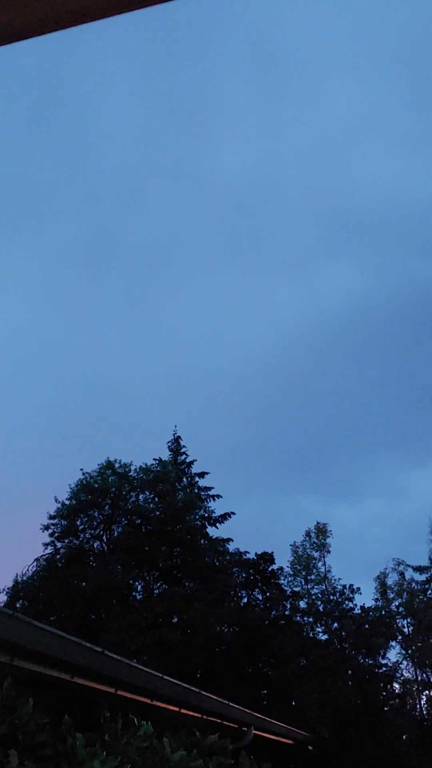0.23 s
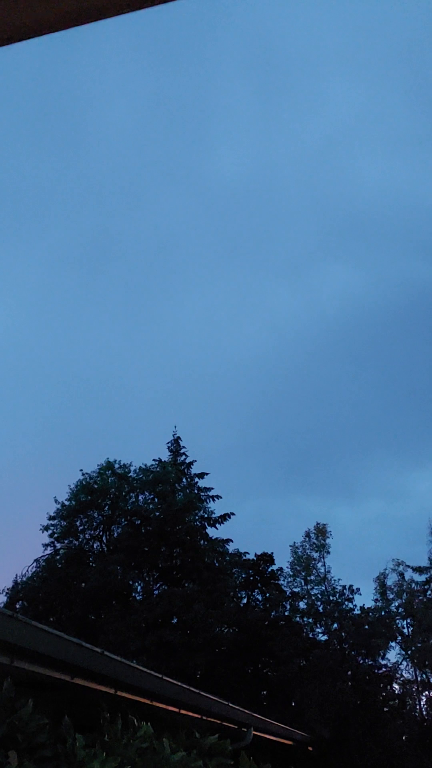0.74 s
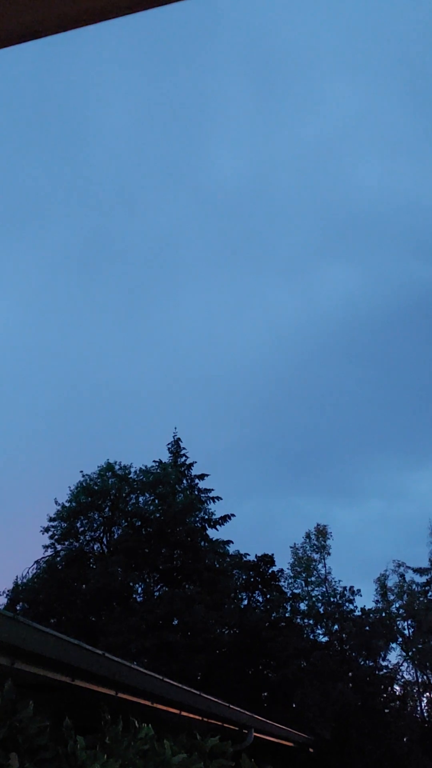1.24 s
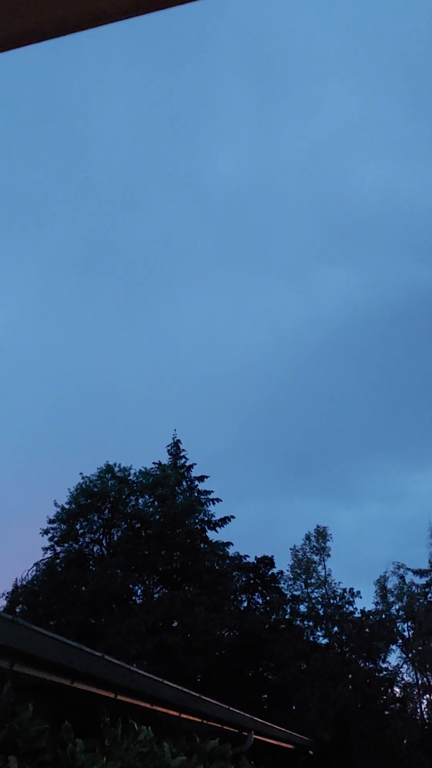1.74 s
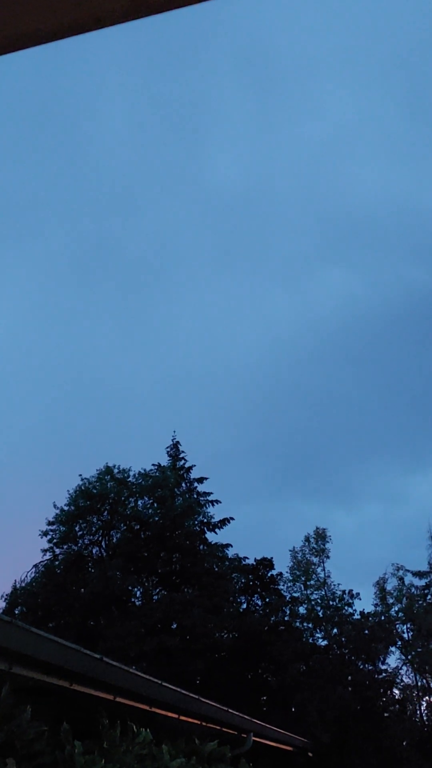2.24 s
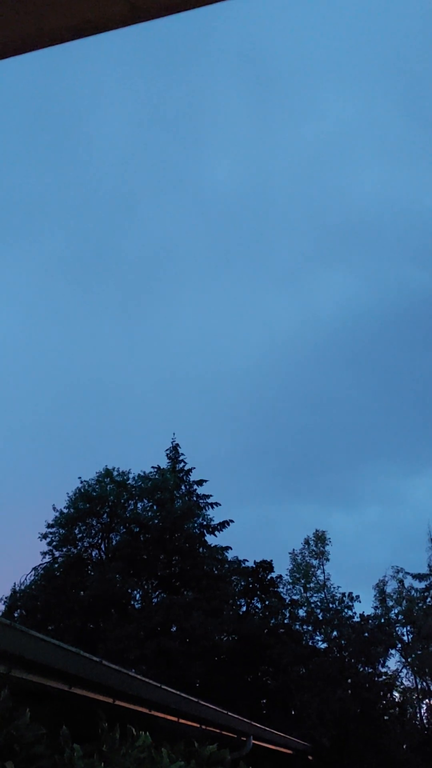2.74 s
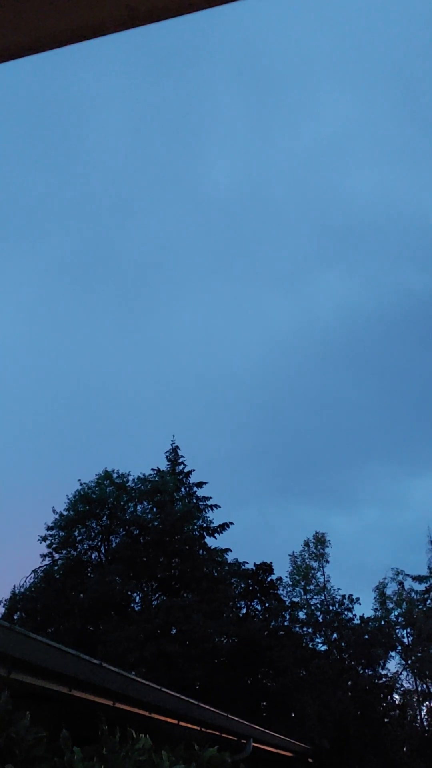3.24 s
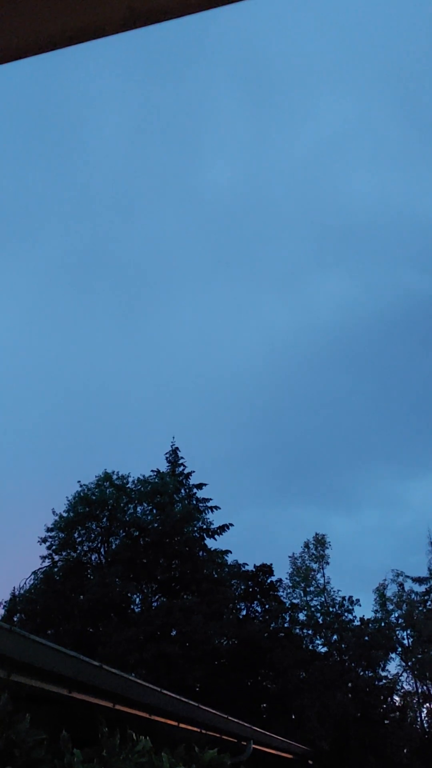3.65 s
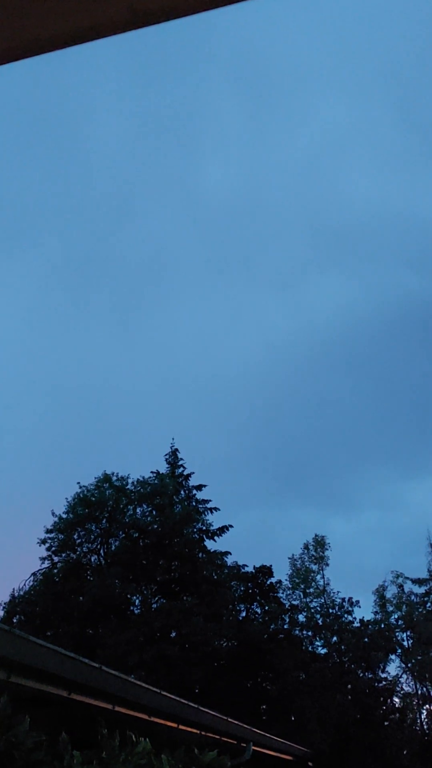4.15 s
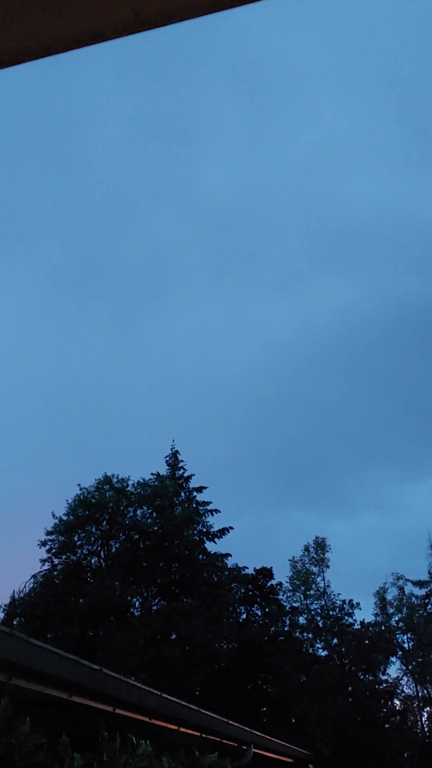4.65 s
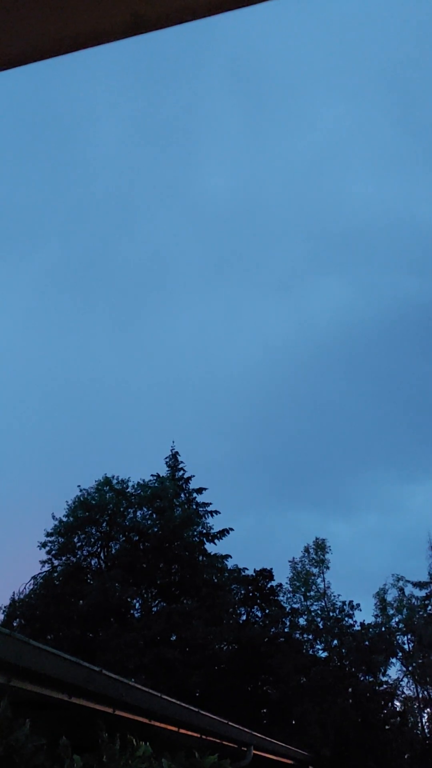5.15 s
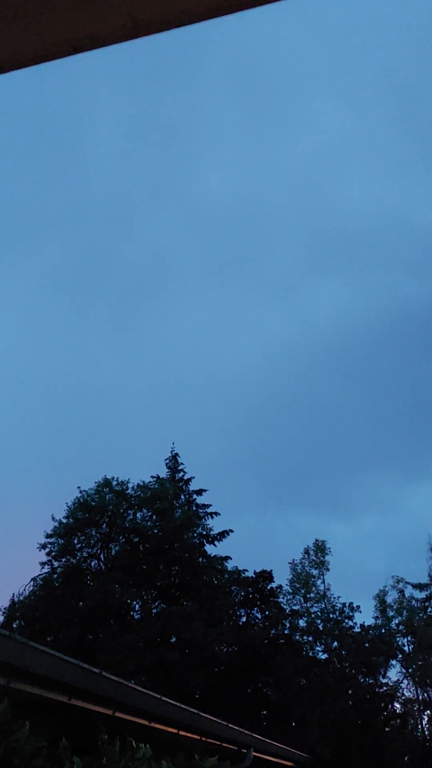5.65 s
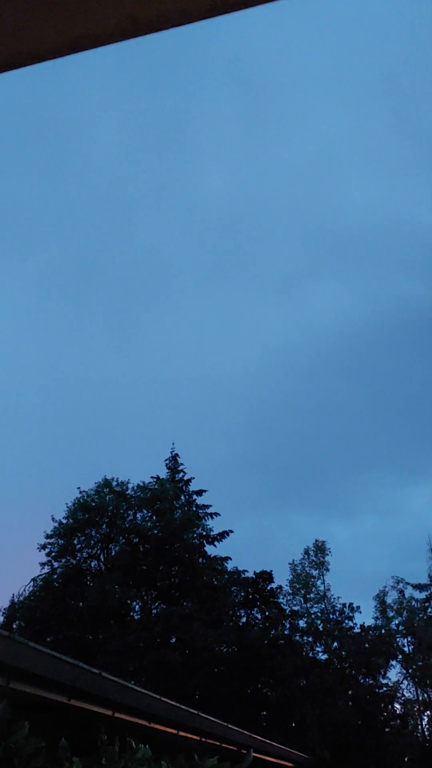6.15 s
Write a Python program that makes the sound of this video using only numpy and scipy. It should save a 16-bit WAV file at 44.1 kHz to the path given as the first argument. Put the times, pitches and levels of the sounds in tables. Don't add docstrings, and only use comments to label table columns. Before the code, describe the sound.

Low, distant thunder rumbles continuously beneath even rainfall outdoors at dusk. Its first swell is a heavy double thud, followed by a long uneven grumble, a second push midway and a third near the end. Over it, soft wide rain on foliage, hollow little knocks on a gutter, thin ticks and crisp splashing drops close to a small stereo microphone sheltered by a roof.

```python
import sys
import numpy as np
from scipy import signal
from scipy.fft import rfft, irfft
from scipy.io import wavfile
from scipy.ndimage import uniform_filter1d

SR = 44100
rng = np.random.default_rng(int(sys.argv[2]) if len(sys.argv) > 2 else 0)


def magnitude_from_level(level_db):
    exponent = np.asarray(level_db, float) / 20
    return 10 ** exponent


def digitize_waveform(pressure):
    field = np.atleast_2d(pressure).T
    bounded = np.clip(field, -1, 1)
    quanta = np.round(bounded * 32767).astype(np.int16)
    wavfile.write(sys.argv[1], SR, quanta)


N = 281786
HZ = np.fft.rfftfreq(N, 1 / SR)
TIME = np.arange(N) / SR

# f/Hz, density/dB per Hz
RAIN_COLOUR = [(200, -19), (380, -4.5), (620, -14), (860, -9.5), (1390, -13.5), (1650, -8), (2300, -8.5),
               (2800, -12.5), (5500, -16), (7600, -27), (8500, -30), (10000, -25.5), (15000, -21),
               (16000, -20)]


def evened(x):
    return x / np.sqrt(np.mean(x ** 2) + 1e-20)


def control(table, column):
    columns = np.transpose(table)
    return np.interp(TIME, columns[0], columns[column])


def read(points, column=1):
    table = np.transpose(points)
    return np.interp(np.log(HZ + 1), np.log(table[0] + 1), table[column])


def peaks(rings):
    return sum(db / (1 + (2 * (HZ - hz) / width_hz) ** 2) for hz, width_hz, db in rings)


def bands(edges_hz, order):
    below = [1 / (1 + (HZ / edge) ** order) for edge in edges_hz]
    return np.sqrt(np.diff([0 * HZ] + below + [1 + 0 * HZ], axis=0))


def coloured(x, gain):
    return irfft(rfft(x) * gain, N)


def add(mix, s, sound):
    part = mix[..., round(s * SR):][..., :sound.shape[-1]]
    part += sound[..., :part.shape[-1]]


def clicks(per_s, spread_db, rows):
    size = magnitude_from_level(spread_db * np.minimum(rng.exponential(1, (rows, N)), 5))
    present = rng.random((rows, N)) < per_s / SR
    return size * present * rng.choice([-1., 1.], (rows, N))


def burst(t60, rise_s):
    t = np.arange(int(.25 * SR)) / SR
    shape = (1 - np.exp(-t / rise_s)) * magnitude_from_level(-60 * t / np.clip(t60, .01, .5))
    return t, shape / shape.max()


def ports(x, other):
    # f/Hz, likeness/0-1, lead of the left/rad
    spacing = [(25, 1, 1.05), (60, 1, .82), (110, 1, .6), (165, .97, .5), (250, .94, 0), (320, .9, .45),
               (470, .74, .85), (660, .5, 0), (830, .74, -.15), (1000, .05, -.2), (1600, .15, 2.6),
               (1730, .5, 2.7), (1900, .08, 2.7), (16000, .05, 2.7)]
    same = np.clip(read(spacing), 0, 1)
    lead = np.exp(-1j * read(spacing, column=2))
    right = same * lead * rfft(x) + np.sqrt(1 - same ** 2) * rfft(other)
    return irfft(np.array([rfft(x), right]), N)


def wash():
    frames = N // 64 + 5
    a, b, c, d, patches = rng.standard_normal((frames, 129, 5)).T
    patches = uniform_filter1d(patches, size=5, axis=0)
    patches = evened(uniform_filter1d(patches, size=40, axis=1))
    flicker = evened(uniform_filter1d(rng.standard_normal(frames), size=30))
    z = np.array([a + 1j * b, c + 1j * d]) * magnitude_from_level(0.65 * patches + 0.84 * flicker)
    return evened(signal.istft(z, nperseg=256, noverlap=192)[1][:, :N])


def patter():
    out = np.zeros((2, N))
    puff_power = burst(t60=0.065, rise_s=0.0024)[1][None] ** 2
    everywhere = clicks(per_s=55, spread_db=2.0, rows=1) ** 2
    for gain in bands([1300, 2600, 4500, 7500, 11500], order=6)[1:]:
        hits = everywhere + clicks(per_s=120, spread_db=3.0, rows=1) ** 2
        power = signal.oaconvolve(hits, puff_power)[:, :N]
        out += coloured(rng.standard_normal((2, N)) * np.sqrt(abs(power)), gain)
    spray = clicks(per_s=400, spread_db=4.5, rows=2)
    spray = coloured(spray, bands([9000], order=4)[1])
    return evened(out) + magnitude_from_level(-2.0) * evened(spray)


def rain():
    # t/s, rain level/dB, gust/dB
    shower = [(0.0, -55.5, -1.5), (0.55, -55, 1), (1.69, -55.5, 0), (2.9, -57, -1), (3.29, -55.5, 0.5),
              (3.79, -56.5, 0), (4.4, -55.5, -1), (4.72, -57, -2), (5.12, -55.5, -1), (5.43, -56.5, -0.5),
              (6.39, -56, 0.5)]
    # f/Hz, width/Hz, level/dB
    gutter_ring = [(1490, 28, -1.5), (1680, 220, 3), (530, 45, 0.5)]
    rain_db = control(shower, column=1)
    low_db = -62.5 + rain_db - rain_db.mean() + control(shower, column=2)
    mix = wash() + magnitude_from_level(-4.0) * patter()
    colour = magnitude_from_level(read(RAIN_COLOUR) + peaks(gutter_ring))
    low, high = (evened(coloured(mix, gain * colour)) for gain in bands([1200], order=8))
    return ports(*(low * magnitude_from_level(low_db + 3.0) + high * magnitude_from_level(rain_db + 2.5)))


def taps():
    t, shape = burst(t60=0.029, rise_s=.003)
    out = np.zeros((2, N))
    for hz in (1600, 1730, 1900):
        hits = clicks(per_s=15, spread_db=3.0, rows=1)
        ring = shape * np.sin(2 * np.pi * hz * t)
        out += signal.oaconvolve(hits, ring[None])[:, :N]
    return magnitude_from_level(-77.0) * evened(out) * np.array([[1.], [-1.]])


def knock(table, rise_s, left_db):
    out = np.zeros((2, N))
    sides = magnitude_from_level([[left_db / 2], [-left_db / 2]])
    noise = rng.standard_normal((len(table), 2, SR // 4))
    for (s, db, hz, width_hz, t60), puff in zip(table, noise):
        t, shape = burst(t60, rise_s)
        resonance = signal.iirpeak(hz, hz / width_hz, SR)
        ring = signal.lfilter(*resonance, puff)
        ring = signal.lfilter(*resonance, ring)
        add(out, s, magnitude_from_level(db - 4.0) * sides * shape * evened(ring)[:, :len(t)])
    return out


def drips():
    # t/s, peak/dB, f/Hz, width/Hz, t60/s
    gutter_drips = [(0.42, -47, 1950, 500, 0.036), (0.4695, -51, 2060, 1500, 0.092),
                    (.4715, -48.5, 4800, 4500, 0.066), (0.469, -44.5, 1860, 1600, 0.076),
                    (.486, -51, 2200, 1590, .07), (0.503, -53, 1900, 900, 0.03),
                    (.82, -52.5, 5300, 4000, 0.16), (1.163, -49, 4960, 2180, .06),
                    (3.77, -51, 1570, 1420, 0.31), (3.802, -50, 4250, 900, 0.066),
                    (3.921, -47, 1580, 900, 0.056), (4.115, -49.5, 4444, 2500, 0.063),
                    (4.311, -55, 1717, 600, .04), (4.39, -50, 1630, 700, 0.039),
                    (4.457, -54, 5170, 3000, 0.12), (2.428, -65, 4470, 3000, 0.054),
                    (2.912, -64, 4460, 2980, .06), (4.937, -49.5, 2300, 1090, 0.06),
                    (5.045, -44, 14500, 3500, .012), (5.113, -53.5, 3780, 4000, 0.38),
                    (5.126, -52, 610, 70, 0.15), (5.336, -46, 1960, 500, 0.046),
                    (5.714, -59, 3240, 3000, 0.078)]
    # t/s, peak/dB, f/Hz
    gutter_flecks = [(0.5947, -47, 1990), (0.6361, -43, 1600), (0.8467, -42, 1600), (1.0637, -55, 1570),
                     (1.1706, -45, 1980), (1.2408, -43, 1780), (1.3151, -48, 2060), (1.5283, -42, 1780),
                     (1.582, -38, 1850), (1.7205, -45, 1710), (1.7594, -50, 1740), (2.054, -41, 1610),
                     (2.1672, -43, 1660), (2.209, -41, 1790), (2.3323, -39.5, 1700), (2.5193, -40, 1590),
                     (2.875, -45, 1930), (3.365, -46, 1730), (3.7735, -48, 1650), (3.92, -47, 1570),
                     (3.971, -44, 1530), (4.168, -45, 1660), (4.226, -48, 1600), (4.3105, -42, 1710),
                     (4.394, -46, 1680), (4.5043, -45, 1720), (4.672, -43, 1900), (4.7667, -49, 1610),
                     (4.8421, -53, 1770), (4.938, -45, 2270), (5.1309, -44, 1360), (5.3335, -49, 1850),
                     (5.3657, -50, 1620), (5.5041, -50, 1650), (5.7196, -43, 1970), (6.1287, -43, 1600)]
    # t/s, peak/dB, f/Hz, width/Hz, t60/s
    hard_ticks = [(.4334, -49, 11000, 9000, .012), (.4773, -33.5, 1750, 890, 0.039),
                  (.5661, -48, 11000, 9000, .015), (2.812, -51, 12500, 7000, .012),
                  (3.0425, -44, 13500, 4000, .09), (3.1931, -50, 11000, 9000, .012),
                  (3.236, -50, 12000, 6000, 0.011), (3.3478, -58, 13000, 6000, .012),
                  (3.7065, -60, 12500, 6000, .012), (3.8023, -53, 12000, 8000, .012),
                  (4.9826, -47, 12500, 7000, .012), (5.0469, -45, 14000, 5000, .012),
                  (5.056, -50, 14500, 3000, .04), (5.3368, -54, 12000, 8000, .012)]
    # t/s, peak/dB, f/Hz
    leaf_pecks = [(0.4269, -50, 3980), (0.472, -49, 3610), (0.8949, -46, 3790), (0.9577, -50, 3750),
                  (1.223, -47, 4230), (1.3425, -45, 3960), (1.5077, -41, 4390), (1.5474, -46, 3590),
                  (2.4279, -48, 4410), (2.812, -47, 4810), (2.909, -46, 3510), (3.1931, -49, 3240),
                  (3.3253, -45, 3090), (3.3862, -46, 5460), (3.802, -45, 4170), (3.921, -48, 3660),
                  (4.3106, -47, 4090), (4.3896, -48, 3500), (4.4588, -48, 3960), (4.5471, -47, 4960),
                  (5.1327, -47, 4480), (5.3283, -47, 3230), (5.459, -48, 3570), (5.5288, -52, 3500),
                  (6.2422, -54, 3370), (6.319, -50, 3320)]
    fleck_width_hz, fleck_t60 = 400, 0.033
    peck_width_hz, peck_t60 = 1600, 0.033
    flecks = [(s, db - 4.5, hz, fleck_width_hz, fleck_t60) for s, db, hz in gutter_flecks]
    pecks = [(s, db - 6.5, hz, peck_width_hz, peck_t60) for s, db, hz in leaf_pecks]
    on_gutter = knock(gutter_drips, rise_s=0.0029, left_db=-0.5) + knock(flecks, rise_s=0.0017, left_db=1.0)
    on_hard = knock(hard_ticks, rise_s=0.00048, left_db=-1.0)
    return on_gutter + on_hard + knock(pecks, rise_s=.002, left_db=4.0)


def splats():
    # t/s, peak/dB, dullness/dB, t60/s
    large_drops = [(0.1062, -51, -8, 0.1), (0.3177, -51, -8, 0.12), (0.432, -47, -10, 0.11),
                   (0.565, -47, -11, 0.066), (0.815, -49, -9, 0.25), (0.9817, -51, -7, 0.16),
                   (1.1164, -49, -18, 0.097), (1.334, -50, -4.5, 0.082), (1.4446, -48, -35, 0.16),
                   (1.5599, -49.5, -4, 0.07), (1.607, -45.5, -5.5, 0.13), (1.787, -51, -4, 0.17),
                   (2.0033, -47.5, -8, 0.27), (2.2214, -50, -18, 0.16), (2.428, -51.5, -3, 0.093),
                   (2.684, -50.5, -5.5, 0.16), (2.812, -48.5, -6, 0.16), (2.9108, -53, -1, 0.1),
                   (3.042, -47.5, -6, 0.23), (3.1934, -48.5, -5.5, 0.068), (3.8016, -45, -6, 0.09),
                   (3.89, -50.5, -4, 0.14), (4.4573, -50.5, -7, 0.14), (4.546, -51.5, -2, 0.063),
                   (4.7636, -49.5, -8, 0.063), (4.8798, -49.5, -6.5, 0.26), (4.9826, -52, -5, 0.084),
                   (5.334, -44.5, -9, 0.13), (5.5263, -52, -6, 0.084), (5.8396, -50.5, -4, 0.24)]
    # t/s, peak/dB, dullness/dB
    small_drops = [(.188, -57, -11.5), (.377, -61, -13), (.636, -53, -3), (.7761, -54.5, 0.5),
                   (.9585, -56.5, 0), (1.0555, -55, -12), (1.2246, -57, 2), (1.4102, -55, -3),
                   (1.6676, -62, 5), (1.9859, -52, -14), (2.3895, -61, 1), (2.9537, -54, -21),
                   (3.0195, -60, -4), (3.236, -62, -10), (3.345, -56, -3), (3.9225, -63, 3),
                   (4.2507, -53, -3), (4.6119, -52, -19), (4.9641, -55, -13), (5.0285, -62, 6),
                   (5.0475, -57, -12), (5.3033, -56, -2), (5.4191, -53, -5), (5.458, -57, -1),
                   (5.6096, -52, -10), (5.7094, -53, -4), (5.779, -54, -1.5), (5.883, -54, -13),
                   (6.0267, -54, -7), (6.2562, -58, -10)]
    small_t60, left_db, scatter_db = 0.1, -0.3, 0.2
    colour = magnitude_from_level(read(RAIN_COLOUR)) * (HZ > 1000)
    dull, middle, bright = (evened(coloured(rng.standard_normal((2, N)), gain * colour))
                            for gain in bands([3000, 8000], order=10))
    shapes = np.zeros((3, 2, N))
    tick = burst(t60=.022, rise_s=.002)[1]
    drops = list(large_drops) + [(s, db, dullness_db, small_t60) for s, db, dullness_db in small_drops]
    pans_db = left_db + scatter_db * rng.standard_normal(len(drops))
    for (s, db, dullness_db, t60), pan_db in zip(drops, pans_db):
        parts = magnitude_from_level(db + np.array([-4., 1.1 * dullness_db - 1.0, 1.55 * dullness_db - 3.0]))
        sides = magnitude_from_level([[pan_db / 2], [-pan_db / 2]])
        spray = magnitude_from_level(-3.5) * burst(t60, rise_s=0.0053)[1]
        add(shapes, s, parts[:, None, None] * sides * np.hypot(tick, spray))
    return bright * shapes[0] + middle * shapes[1] + dull * shapes[2]


def roll():
    # t/s, strength/dB, depth that sinks it to the lowest notes/dB, nearness that lifts the rattle/dB
    swells = [(0.0, -61, -6, 13.5), (0.12, -46.5, 2, 0.5), (0.34, -44, 3, -3), (0.6, -41, 6, 1.5),
              (0.98, -47.5, 4, 3.5), (1.07, -44.5, 2, 3), (1.83, -47, -2, -0.5), (2.69, -48, 4.5, 0.5),
              (3.26, -42, -3.5, 0), (3.61, -44.5, 2, -2.5), (3.83, -44, -3, -1), (3.98, -44, 6, -2),
              (4.54, -48.5, 5, 2), (5.09, -47, -0.5, 1.5), (5.23, -42.5, -5.5, -5.5), (5.87, -46, 5, -0.5),
              (6.12, -42.5, 6.5, -0.5), (6.39, -42.5, -9.5, -1.5)]
    layer_edges = [62, 92, 140, 222]
    # level/dB, share of strength, of depth, of nearness
    layers = [(-5, 1, 0.053, 0.37), (-4.5, 1, 0.81, 0.23), (-3, .99, -.6, 0.24), (-8.5, 1, -0.25, 0.99),
              (-11, 0.76, 0.068, .95)]
    # f/Hz, density/dB per Hz
    eaves_colour = [(14, -32), (26, -20), (42, -8), (63, -6), (73, -1.5), (120, -0.5), (148, -9),
                    (172, -12), (194, -6), (222, -10), (250, -6.5), (310, -12), (440, -23), (800, -60)]
    middle_db = -43
    strength = control(swells, column=1) - middle_db
    depth, nearness = control(swells, column=2), control(swells, column=3)
    shocks = clicks(per_s=900, spread_db=2.5, rows=2)
    out = np.zeros((2, N))
    for gain, (db, by_strength, by_depth, by_nearness) in zip(bands(layer_edges, order=16), layers):
        part = coloured(shocks, gain * magnitude_from_level(read(eaves_colour)))
        slow_power = uniform_filter1d(uniform_filter1d(part ** 2, size=3000), size=3000)
        part = part / np.sqrt(slow_power + 1e-12) ** 0.56
        moved_db = by_strength * strength + by_depth * depth + by_nearness * nearness
        out += evened(part) * magnitude_from_level(middle_db + db + moved_db)
    return out


def single_shocks():
    # t/s, peak/dB, f/Hz, t60/s
    booms = [(0.184, -26.5, 124.4, 0.16), (0.444, -23, 80, 0.098), (0.528, -14.5, 120, 0.097),
             (0.578, -17, 98, 0.1), (0.761, -29, 71, 0.13), (1.037, -30, 79.4, 0.2),
             (1.138, -27, 80.2, 0.35), (1.249, -28, 76.2, 0.15), (1.516, -24, 93.3, 0.13),
             (1.655, -28.5, 77.6, 0.28), (1.778, -30.5, 118, 0.12), (2.001, -27, 96, .15),
             (3.3, -23.5, 89, 0.17), (2.925, -26, 123, 0.089), (3.139, -29, 111, 0.18),
             (3.185, -29.5, 106, 0.1), (3.248, -21, 91, 0.14), (3.321, -18.5, 92.5, 0.17),
             (3.559, -26.5, 87.5, 0.16), (3.825, -30, 90, 0.31), (4.079, -21, 90.6, 0.17),
             (4.247, -28, 81.5, 0.33), (4.463, -25.5, 96, 0.43), (4.594, -28, 115, 0.14),
             (4.891, -28, 90, 0.1), (5.115, -31, 121, 0.074), (5.208, -26, 97.8, 0.38),
             (5.504, -28, 102.4, 0.19), (5.99, -24, 76, 0.084), (6.131, -19.5, 105, 0.14),
             (6.298, -46, 102, 0.16)]
    # t/s, peak/dB, f/Hz, t60/s
    thumps = [(.14, -33, 121.3, 0.24), (.74, -31, 60, .3), (1.797, -30.5, 132, 0.31),
              (3.08, -37, 280, 0.31), (3.375, -36.5, 245, 0.18), (2.5, -32, 240, 0.18),
              (3.1, -40, 300, 0.32), (0.55, -35, 180, 0.42), (1.45, -31, 48, 0.45), (3.021, -29, 42, 0.25),
              (3.9, -46, 50, 0.21), (4.2, -48, 63, .3)]
    # t/s, peak/dB, f/Hz
    high_knocks = [(0.205, -32, 144), (0.269, -27, 135.5), (0.499, -42, 185), (0.618, -33, 225.6),
                   (0.698, -39, 206), (0.923, -33, 211.6), (1.029, -40.5, 254), (1.207, -42.5, 192.7),
                   (1.319, -38, 240), (1.442, -35, 178.3), (2.5, -38.5, 192.4), (2.779, -58, 202),
                   (3.066, -32, 144.5), (3.172, -33, 199), (3.345, -27, 141), (3.74, -51, 140),
                   (3.876, -33, 141.4), (4.53, -30, 144.2), (4.793, -41.5, 186), (5.188, -36, 195.5),
                   (5.277, -50, 244), (6.231, -48, 189), (6.325, -32, 197)]
    # t/s, peak/dB, f/Hz
    surges = [(0.086, -35.5, 91), (0.316, -30, 127), (0.691, -35, 80.7), (0.94, -31, 78.1),
              (1.428, -36, 86.1), (1.956, -40, 98), (2.069, -32.5, 79), (2.163, -34, 95),
              (2.272, -39, 86.1), (2.403, -32, 96.9), (2.523, -40, 87), (2.595, -39, 93), (2.822, -37, 118),
              (3.008, -30, 85.6), (3.409, -26.5, 111.3), (3.609, -34, 82), (3.727, -33.5, 100.6),
              (3.881, -29.5, 96), (3.948, -33, 105.6), (4.34, -41, 79), (4.655, -38, 90),
              (4.763, -32.5, 92.4), (5.376, -29.5, 101.5), (5.587, -37, 116.3), (5.656, -36, 80),
              (5.857, -41, 75.4), (6.228, -29.5, 85.5), (6.34, -30, 88)]
    # t/s, peak/dB, f/Hz
    growls = [(1.242, -38.5, 177), (2.253, -45, 183.5), (2.72, -42, 141), (3.416, -45, 143),
              (3.505, -40, 186), (3.569, -41, 186), (3.767, -48, 197), (4.091, -45, 186),
              (4.185, -45.5, 214), (4.919, -39.5, 187), (5.408, -41, 190), (5.836, -45.5, 192)]
    lesser_t60, knock_t60 = 0.22, 0.26
    events = list(booms) + list(thumps)
    events += [(s, db + 2.5, hz, lesser_t60) for s, db, hz in list(surges) + list(growls)]
    events += [(s, db, hz, knock_t60) for s, db, hz in high_knocks]
    out = np.zeros(N)
    for s, db, hz, t60 in events:
        t, shape = burst(t60, rise_s=.025)
        add(out, s, magnitude_from_level(db - 8.5) * shape ** 1.32 * np.sin(2 * np.pi * hz * t))
    return out


def crackle():
    # t/s, peak/dB, f/Hz
    crackles = [(0.203, -42.5, 283), (0.527, -37, 244), (0.637, -45, 245), (0.705, -45, 255),
                (0.861, -44, 248), (0.933, -41, 252), (1.027, -44, 249.6), (1.09, -48, 233),
                (1.167, -42, 310), (1.318, -42, 228), (1.402, -38, 269), (1.475, -49, 245),
                (1.588, -58, 269), (1.977, -49, 250), (2.346, -51, 300), (2.708, -43, 263.6),
                (2.782, -42, 281), (2.887, -48, 241), (3.04, -40.5, 270), (3.252, -46, 270),
                (3.346, -38.5, 266), (3.484, -44, 242), (3.586, -49, 290), (3.705, -46, 264),
                (3.878, -44, 233), (4.177, -52, 299), (4.408, -43.5, 229), (4.543, -45, 248),
                (4.727, -50, 272), (5.192, -41, 252), (5.275, -43, 242), (5.611, -50, 247),
                (5.979, -44, 283), (6.102, -43, 233), (6.235, -41, 254), (6.328, -40, 232)]
    out = np.zeros(N)
    t, shape = burst(t60=0.11, rise_s=0.0089)
    for s, db, hz in crackles:
        add(out, s, magnitude_from_level(db - 3.5) * shape * np.sin(2 * np.pi * hz * t))
    return out


def thunder():
    # f/Hz, width/Hz, level/dB
    eaves_ring = [(72.4, 10, 4), (118, 44, 2), (186, 42, 2)]
    give_way_db, bed_db = -41, -1
    out, single = roll(), single_shocks()
    power = abs(uniform_filter1d(uniform_filter1d(single ** 2, size=900), size=900))
    low = coloured(out, bands([150], order=8)[0] ** 2)
    out = out - low + low * magnitude_from_level(bed_db) / np.sqrt(1 + power / magnitude_from_level(2 * give_way_db))
    out[0] += single + crackle()
    return ports(*coloured(out, magnitude_from_level(peaks(eaves_ring) - 0.5)))


def scene():
    return rain() + taps() + drips() + splats() + thunder()


def roll_off(x):
    return signal.sosfilt(signal.butter(12, 17050, fs=SR, output="sos"), x)


def record(dry):
    # f/Hz, left over right/dB
    lean_points = [(27, -13), (46, -2), (80, 0), (140, 2), (185, 4.5), (300, -3), (420, 0), (570, 10.5),
                   (850, 0.5), (1150, -3), (1700, -5.5), (2740, 3), (6400, -0.5), (12000, 2.1)]
    edge_hz = 15840
    lean = magnitude_from_level(np.array([[.5], [-.5]]) * read(lean_points))
    band_limit = np.clip((edge_hz - HZ) / 80, 0, 1)
    return roll_off(coloured(dry, lean * band_limit))


dry = scene()
out = record(dry)
digitize_waveform(out)
```